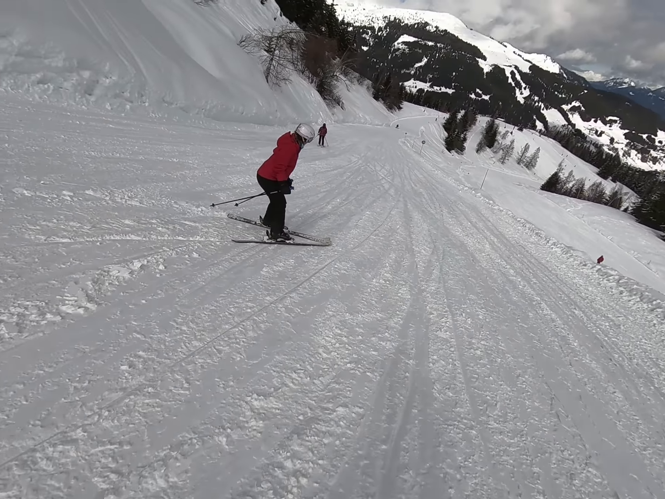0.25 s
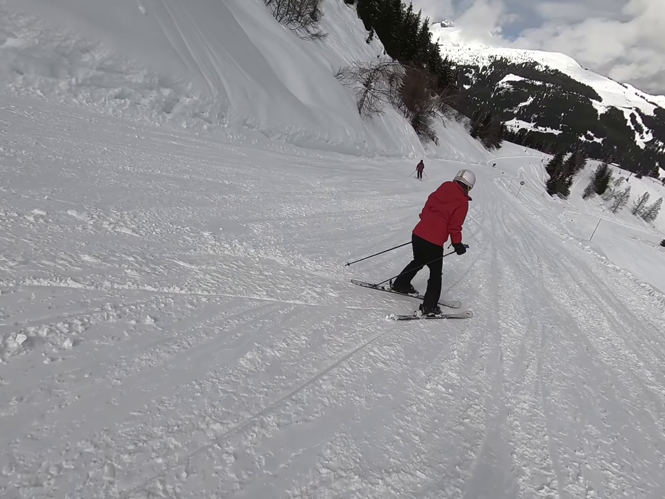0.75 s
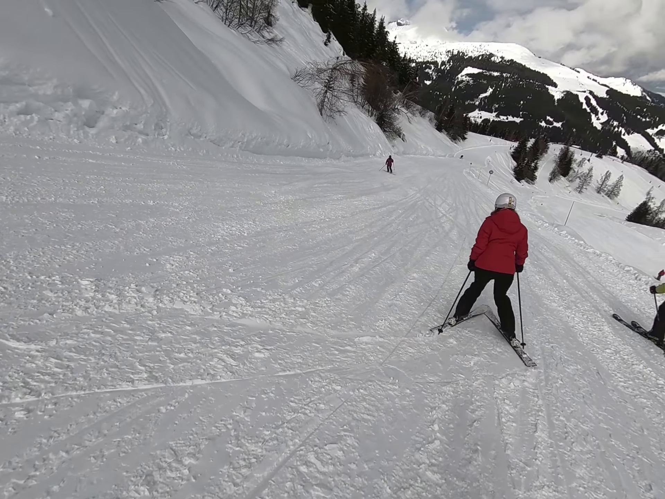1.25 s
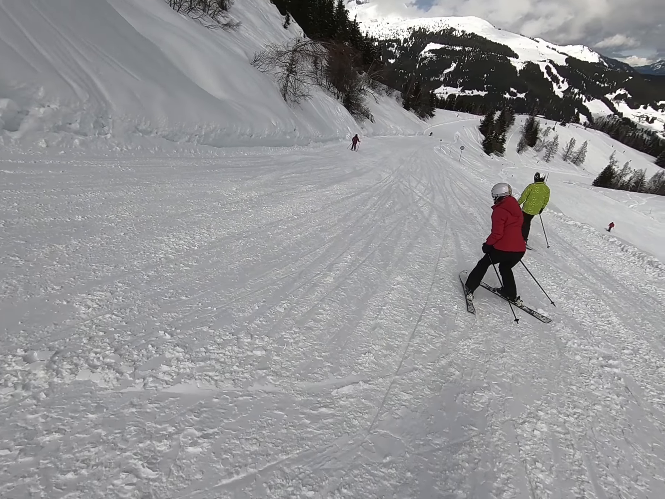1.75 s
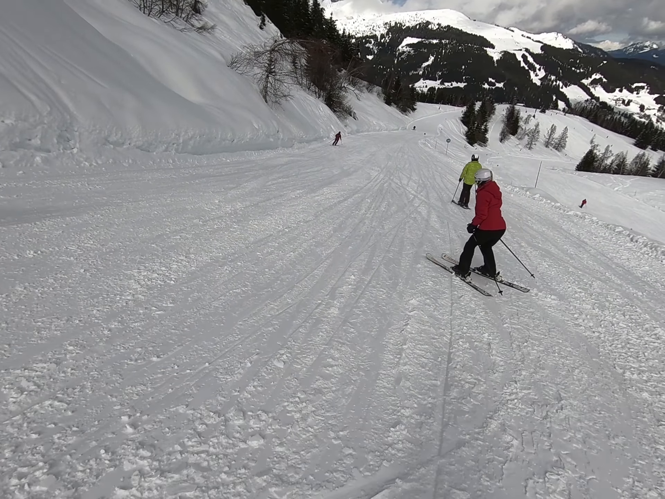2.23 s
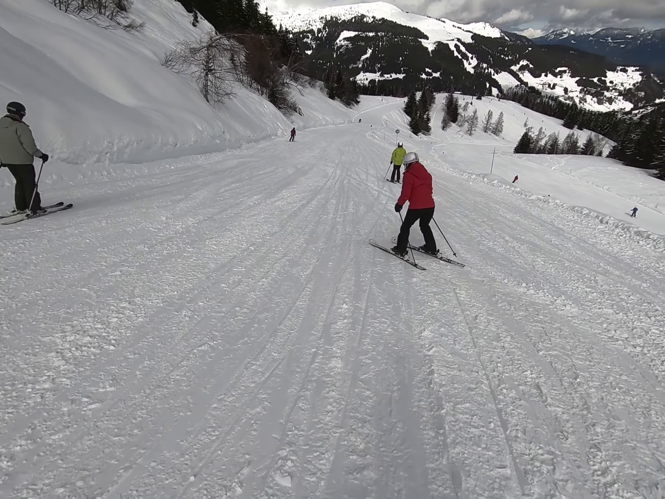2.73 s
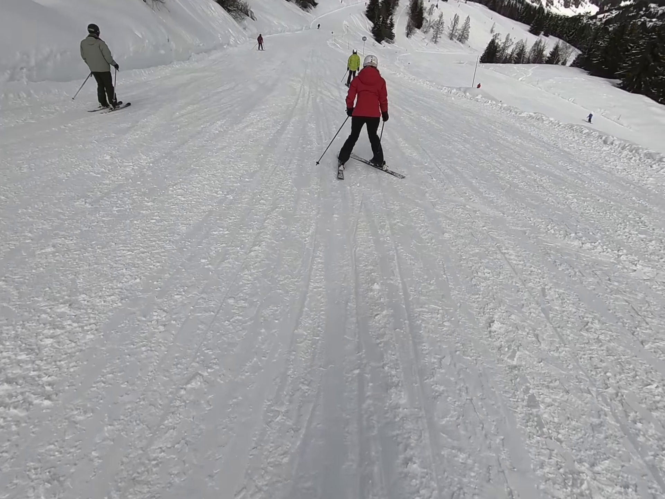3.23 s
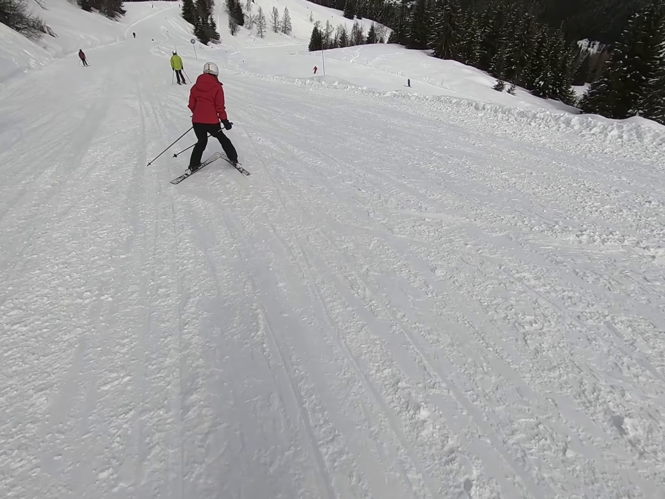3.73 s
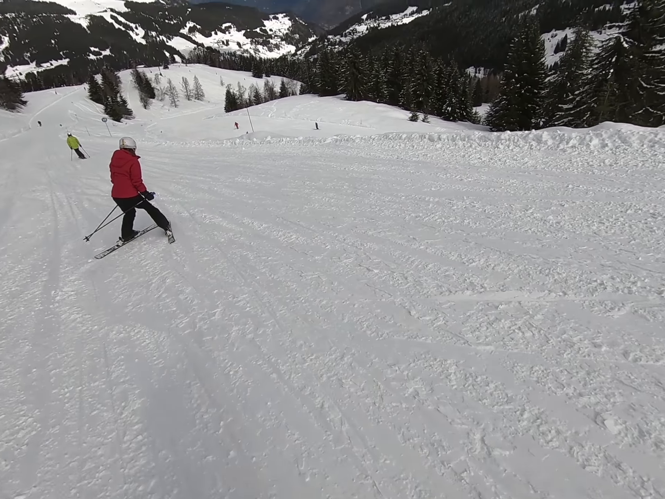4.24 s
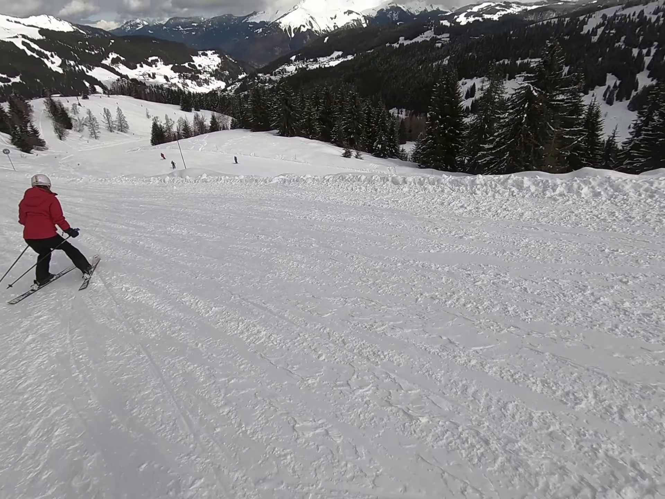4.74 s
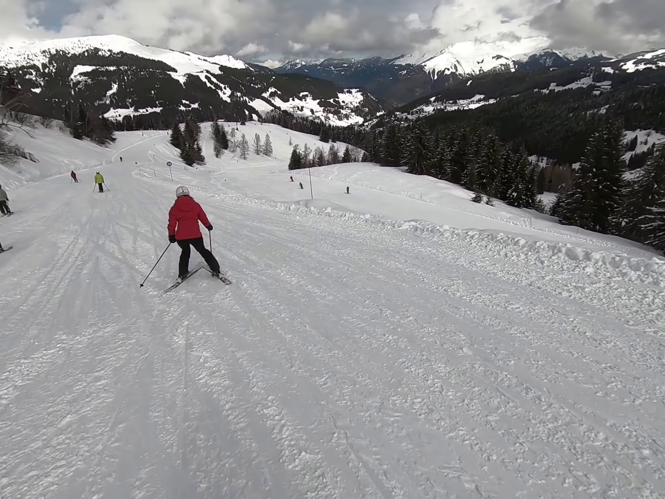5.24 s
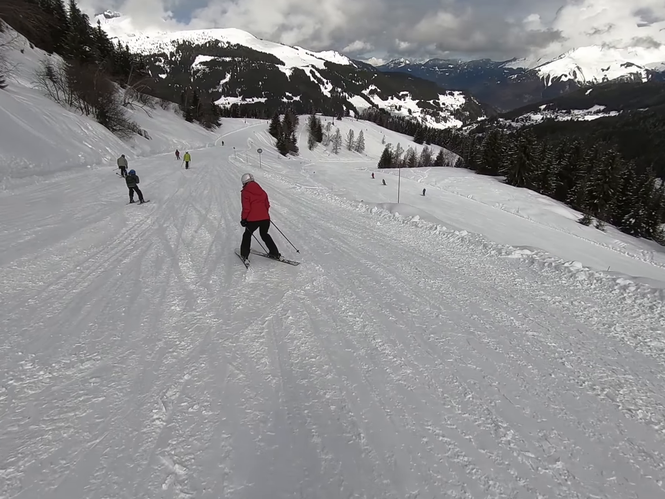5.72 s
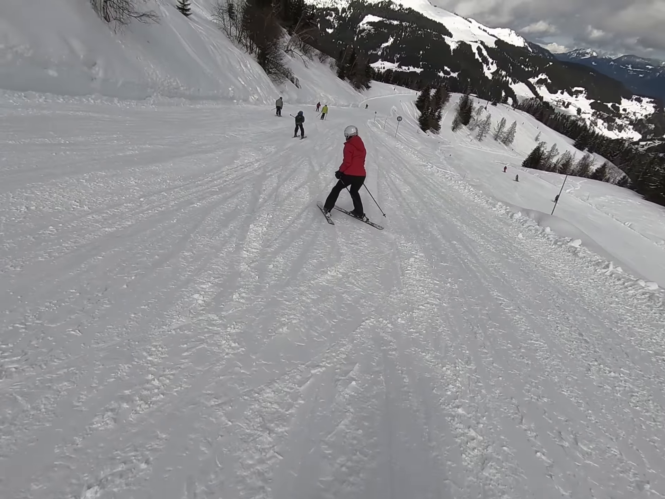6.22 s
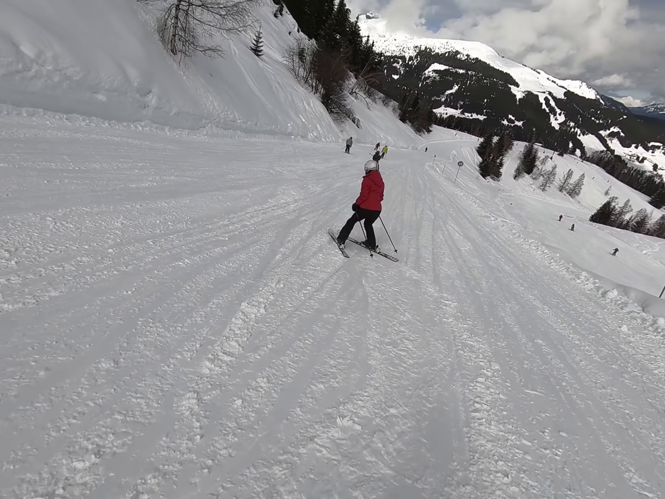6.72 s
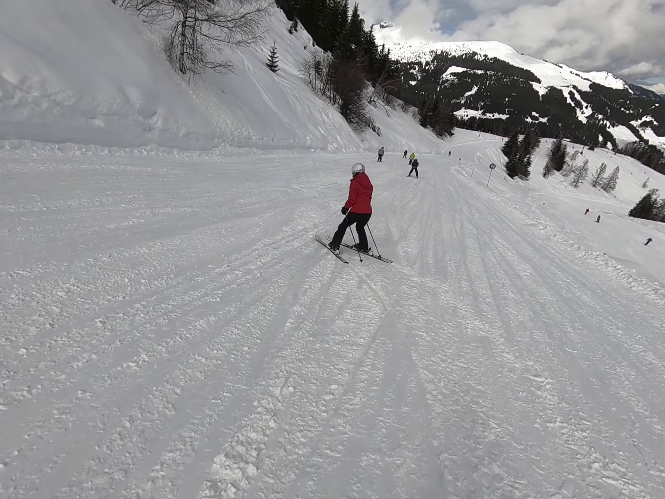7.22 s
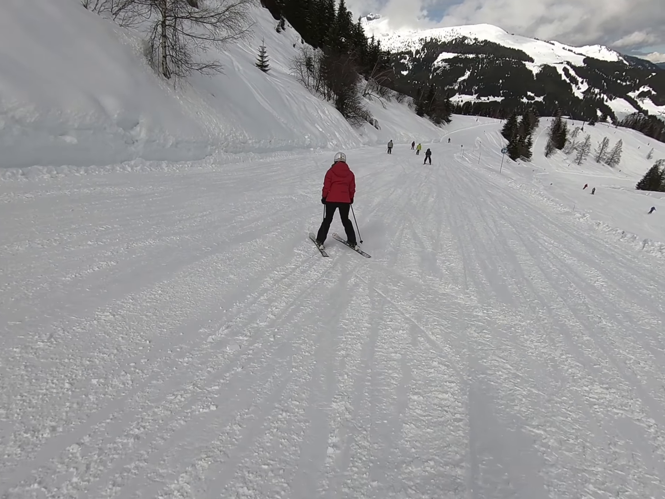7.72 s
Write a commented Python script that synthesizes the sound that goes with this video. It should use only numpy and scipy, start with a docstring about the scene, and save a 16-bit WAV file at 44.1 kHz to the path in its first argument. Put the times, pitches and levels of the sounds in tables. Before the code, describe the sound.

Heard from a microphone worn by a moving skier on an open slope: skis scrape and spray over rough snow, clear and nearly mono with little bass. Another skier hisses past faintly. Around two seconds the sound widens to stereo and deep wind rumble, buffeting and pops flood in, while scraping, crunches and small ski knocks continue until the end.

```python
"""Skis scrape and spray over chopped snow from the first moment, heard from a camera on a skier.
At first its wind mode uses one microphone with the bass cut; only the top treble is stereo.
Then the sound fades mostly to a stereo pair, and wind rumble, buffeting and pops come through.
Skis and wind are shaped noise, with ringing tones for the housing and the singing skis.
Pops are thumps falling in pitch, knocks are short rings, and a passing skier is a bright hiss."""
import sys
import numpy as np
from scipy import signal
from scipy.fft import rfft, irfft, next_fast_len
from scipy.io import wavfile
from scipy.ndimage import uniform_filter1d

SR = 44100
rng = np.random.default_rng(int(sys.argv[2]) if len(sys.argv) > 2 else 0)


def output_pcm(signal):
    """Save a mono or channel-first signal as 16-bit PCM at the path in sys.argv[1].

    Samples are clipped to [-1, 1] before scaling.
    """
    pcm = np.clip(np.atleast_2d(signal).T, -1, 1) * 32767
    wavfile.write(sys.argv[1], SR, np.round(pcm).astype(np.int16))


N = 351477  # length in samples

# In colour tables the level is per Hz and only its shape counts.
# Side is left minus right: above 0 is louder on the left.
# How much of the stereo pair replaces the single microphone: t/s, share/0-1
PAIR_SHARE = [(1.87, 0.0), (2.1, 0.26), (2.5, 0.91), (2.95, 0.8)]

# Scraping and spraying skis: t/s, scrape level/dB, scrape tilt/dB per octave, spray level/dB
SKI_CURVE = [(0.0, -44, 3.5, -50), (0.35, -41.5, 1.2, -50.5), (0.68, -39.5, -2, -52),
             (0.88, -40.5, -1.5, -53.5), (1.0, -42.5, 0.5, -53.5), (1.17, -42.5, 0.5, -53.5),
             (1.35, -45, 1.5, -53), (1.69, -46, 1.5, -55), (2.1, -48, -1.5, -56),
             (2.45, -46.5, -2.5, -54.5), (2.88, -49.5, 0.3, -53.5), (3.15, -46, -0.5, -49.5),
             (3.56, -48.5, 2, -50), (3.66, -47.5, -1.4, -54), (4.2, -45, -2, -52), (4.7, -43, -1.9, -49),
             (4.88, -48, -1, -53.5), (5.15, -50, 0, -55), (5.35, -56.5, 3.5, -59), (5.48, -56.5, 6, -60),
             (5.62, -50.5, 0, -57), (5.97, -45, -2, -52), (6.41, -43.5, -1.5, -50.5),
             (6.95, -47.5, -0.5, -53), (7.45, -46, -0.5, -51), (7.8, -51, 0.5, -54.5), (7.97, -48, 0, -57)]
# Tilt of the spray's colour: t/s, tilt/dB per octave
SPRAY_TILT = [(0.0, 2), (1.75, -2), (2.05, -1), (2.3, 0), (2.7, 1), (4.7, 0.4), (5.0, 0), (5.5, -2),
              (6.0, 2.5), (7.97, 2.5)]
# Side of the skis at the pair: t/s, scrape side/dB, spray side/dB
SKI_SIDE = [(2.1, -8, 3), (2.5, 2.5, 0), (3.15, 4, 0), (3.4, 0, 6), (3.75, -10.5, 1), (4.9, -11, 0),
            (5.3, -8.5, -3), (5.9, -12, -4.5), (6.3, -10.5, -1), (6.9, -7.5, -0.5), (7.3, -11, -1),
            (7.97, -8.5, -1)]
# Edges biting into hard lumps: t/s, level over the scrape/dB
CRUNCHES = [(0.05, 5), (0.3, 2.5), (0.94, 2), (2.26, 3), (3.08, 2), (3.28, 3), (3.7, 3.5), (4.1, 1.5),
            (4.52, 4.5), (4.68, 2), (4.81, 2), (5.07, 2.5), (5.95, 3.5), (6.15, 2), (6.33, 3), (6.8, 1),
            (7.22, 3), (7.5, 2), (7.88, 5)]
# Scrape colour at the single microphone: f/Hz, level/dB
SCRAPE_COLOUR_SINGLE = [(62, -50), (105, -31), (135, -1), (192, 2), (300, -4), (480, -1.5), (900, -6),
                        (1500, -9.5), (1750, -9), (2300, -23.5), (3300, -35.5), (4290, -63)]
# Scrape colour at the stereo pair: f/Hz, level/dB
SCRAPE_COLOUR_PAIR = [(210, -17), (350, -3), (550, -6), (880, -4.5), (1150, -4.5), (1300, -2), (1500, -7.5),
                      (1680, -6.5), (1790, -7.5), (1920, -7), (2610, -8), (3200, -11.5), (4000, -20),
                      (5200, -53.5)]
# Spray colour at the single microphone: f/Hz, level/dB
SPRAY_COLOUR_SINGLE = [(1530, -45), (2600, -12), (3530, -11.5), (4300, -5.5), (5550, 0), (7680, -10.5),
                       (9080, -13.5), (10900, -25.5), (11500, -35), (15000, -52), (22000, -120)]
# Spray colour at the stereo pair: f/Hz, level/dB
SPRAY_COLOUR_PAIR = [(2500, -10), (3600, -5.5), (4200, -3), (5200, 0), (6500, 0), (7600, -1.5),
                     (8400, -5.5), (9300, -9.5), (11000, -16), (12500, -20), (14300, -23.5), (15500, -33)]
# How alike the pair's two channels are for ski sound: f/Hz, likeness/0-1
SKI_LIKENESS = [(480, .7), (900, .6), (1600, .72), (2900, .36), (4200, .28), (6000, .4), (8000, .36),
                (11000, .2)]
# Phase by which the pair's left channel leads for ski sound: f/Hz, lead/radians
SKI_LEAD = [(520, -.3), (820, 1.3), (1900, .3), (3000, -1.3), (4200, -.9), (5500, -3.7), (7500, -4.9),
            (9300, -7.2)]
# Spray image shifting once, near 4 s: t/s, added lead/radians per kHz from 6 kHz, likeness factor
SPRAY_IMAGE = [(3.7, 1.5, 1.25), (4.1, 0, .4), (6.0, 0, .8)]
# Side of the spray by pitch: f/Hz, side/dB
SPRAY_SIDE = [(3700, 0), (4600, 2.5), (5700, 2), (6700, -0.5), (9500, 1.5)]
# Skis singing at an upper mode while they carve: t/s, level against the scrape/dB
SINGING = [(2.5, -22), (3.8, -18), (4.35, -12.5), (4.6, -10.5), (4.8, -9.5), (5.12, -8.5), (5.35, -23),
           (6.2, -23), (7.0, -13.5), (7.97, -13)]
# Stereo top treble of the wind mode: f/Hz, level/dB
TOP_COLOUR = [(6710, -50), (11400, -8), (11900, 1), (12400, 4.5), (14800, -3), (15500, -1.5)]

# Wind left by the bass cut: f/Hz, level/dB
CALMED_COLOUR = [(15, -18), (25, -2), (50, -5), (80, -12), (115, -9), (160, -50), (500, -92)]

# Hard lumps knocking the skis: t/s, peak level/dB, centre of the blow f/Hz, side/dB
KNOCKS = [(0.49, -39, 600, 0), (0.933, -32, 600, -2), (2.255, -38, 1500, -2), (2.877, -42, 1500, -6),
          (3.4525, -38, 1250, -10), (3.56, -37, 1600, -8), (3.966, -37, 1800, -12), (4.51, -42, 2000, -10),
          (4.564, -37, 1800, -10), (4.665, -40, 1300, -10), (5.075, -39, 1800, -11), (5.26, -45, 1800, -9),
          (5.751, -39, 1300, -15), (5.945, -40, 1400, -9), (6.487, -40, 1300, -6), (7.13, -39, 1300, -8),
          (7.505, -40, 1400, -8), (7.789, -36, 1800, -4), (7.869, -35.5, 1400, -6), (7.882, -41, 900, -8)]
# Ringing modes of the skis: f/Hz, level/dB, time to fall by 60 dB/s
SKI_MODES = [(600, -6, 0.059), (940, -4, 0.028), (1314, 1.5, 0.027), (1792, -1.5, 0.043), (2205, -3, 0.035),
             (2800, -6.5, 0.018)]
# Single wind pops at the microphone ports: t/s, level/dB, final pitch f/Hz, length/s, side/dB
POPS = [(1.909, -28.5, 120, 0.018, -0.5), (1.997, -30.5, 150, .011, -1), (2.137, -36, 500, 0.0064, -8),
        (2.8775, -25, 222, 0.0073, -8), (3.256, -32, 150, 0.015, 13), (3.285, -32.5, 600, 0.0049, -8),
        (3.295, -36, 700, .005, -6), (3.334, -36, 496, 0.006, -15), (3.681, -36, 450, .005, -12),
        (3.687, -34, 300, 0.0093, -8), (3.705, -32, 300, 0.0092, -11), (5.04, -37, 252.4, 0.011, -10),
        (5.22, -36.5, 200, 0.014, -14), (5.785, -30.5, 150, 0.018, -14), (5.795, -28, 160, 0.018, -10),
        (5.92, -37, 140.5, 0.014, -2), (7.933, -40, 250, 0.013, -6)]

# Brighter spray while another skier slides by: t/s, level/dB
PASSING_LEVEL = [(1.35, -76), (1.52, -56), (1.8, -58), (2.2, -65)]
# Colour of that spray: f/Hz, level/dB
PASSING_COLOUR = [(5500, -28), (6500, -1), (7500, -4), (8400, -9), (9200, -30), (12000, -70)]

# Wind ringing the housing: t/s, level/dB
BOOM_LEVEL = [(1.87, -51), (2.04, -37.5), (2.3, -27.5), (2.5, -21.5), (2.8, -27.5), (3.1, -22),
              (3.4, -21.5), (3.6, -16.5), (3.78, -18.5), (4.25, -23), (4.55, -27), (4.75, -24),
              (5.05, -20.5), (5.3, -23.5), (5.52, -27), (5.65, -19), (6.15, -18.5), (6.4, -27), (6.7, -26),
              (6.95, -30.5), (7.1, -24.5), (7.35, -29.5), (7.55, -19.5), (7.8, -21), (7.97, -26)]
# Colour of the noise around the ring: f/Hz, level/dB
RUMBLE_COLOUR = [(14, -15), (24, 0), (34, -1), (45, 0), (58, -3), (74, -15), (100, -32), (400, -90)]
# Brief dips of the wind between gusts: t/s, drop/dB
LULLS = [(2.4, 11), (2.66, 12), (2.87, 11), (3.27, 7), (3.43, 3.5), (3.86, 14), (3.98, 7), (4.1, 11),
         (4.48, 3.5), (4.62, 6), (4.9, 7), (5.43, 13), (5.79, 2), (6.07, 11.5), (6.45, 8), (6.91, 14),
         (7.25, 7), (7.59, 8), (7.71, 7), (7.92, 5)]
# Buffeting at the ports: t/s, level/dB, side/dB, tilt/dB per octave
BUFFET_CURVE = [(1.87, -62, -1, 0), (1.95, -46, -1, -1), (2.62, -31.5, -11, .5), (2.85, -27.5, 2.5, 0),
                (3.2, -25.5, 0, 1), (3.65, -31, -4.5, 2.1), (4.1, -35, 7.5, -1.5), (4.3, -40.5, 5, -2.5),
                (4.85, -34, -1, -1), (5.15, -39, -6, -1), (5.3, -34.5, 6, 0), (5.52, -31, -10, 1.5),
                (5.8, -32.5, -11.5, 6), (5.92, -29, -1, 2), (6.1, -32.5, -6, 4), (6.25, -30, -6, 1.5),
                (6.6, -30.5, -11, 0.5), (6.88, -33.5, -1, -.5), (7.08, -23, 0.5, -2), (7.25, -28, -8.5, -3),
                (7.5, -30.5, 5, -1.5), (7.97, -27, 3.5, -1)]
# Colour of the buffeting before tilting: f/Hz, level/dB
BUFFET_COLOUR = [(40, -0.5), (75, 6), (120, 2), (170, -5.5), (260, -13), (400, -22.5), (800, -39.5),
                 (3000, -99)]

CRUNCH_S, SPRAY_SHARE = 0.023, 0.41  # half-width of a bite (s), part of its dB that reaches the spray
SING_HZ, SING_WIDTH_HZ = 1800, 49
SING_WANDER, SING_LUMPS_DB = 0.011, 2.5  # drift as a share of pitch, unevenness (dB rms)
TOP_DB, TOP_FALLS_S, TOP_FALL_DB_PER_S = -59, .47, 7.3  # starting level, start and speed of its fall
CALMED_DB, CALMED_LUMPS_DB = -55.5, 5
BLOW_OCTAVES = 0.43  # how far around its centre a blow reaches
BOOM_HZ, BOOM_LUMPS_DB = 43.1, 1.5
BOOM_WANDER, BOOM_WOBBLE = 0.0708, 0.089  # slower and faster drift, as a share of pitch
LULL_S = 0.036  # half-width of a lull
EDGE_HZ = 15650  # top of the band


def gain_of(db):
    """Turns decibels into a factor."""
    return 10 ** (np.asarray(db) / 20)


def evened(x):
    """Scales to rms 1."""
    return x / np.sqrt(np.mean(x ** 2) + 1e-20)


def read(points, hz):
    """Reads a table along a log-frequency axis."""
    f, value = np.transpose(points)
    return np.interp(np.log(hz + 1), np.log(f + 1), value)


def columns(rows, t):
    """Reads each column of a curve at the times t."""
    s, *values = np.transpose(rows)
    return [np.interp(t, s, v) for v in values]


def pair_share(t):
    """Share of the stereo pair at the times t."""
    return columns(PAIR_SHARE, t)[0]


def drift(t, rate):
    """Slow chance of rms 1: a sum of sines up to the given rate a second."""
    f = np.geomspace(rate / 10, rate, 30)[:, None]
    return evened(np.sin(2 * np.pi * (f * t + rng.random(f.shape))).sum(0))


def slow(t, rate):
    """Slow chance, drawn coarsely and read at the times t."""
    coarse = t[::64]
    return np.interp(t, coarse, drift(coarse, rate))


def bumps(t, rows, width):
    """Short swells in dB, one for each row."""
    return sum(db * np.exp(-((t - s) / width) ** 2) for s, db in rows)


def grid(size):
    """Frequencies (a column) and times of short-time spectra."""
    return np.fft.rfftfreq(size, 1 / SR)[:, None], (np.arange(4 * N // size + 4)) * size / 4 / SR


def noise(db, same, lead=0, side_db=0):
    """Two-channel noise of rms 1 from a dB field over frequency and time, with even power over time."""
    size = 2 * len(db) - 2
    a, b, c, d = rng.standard_normal((db.shape[1], len(db), 4)).T
    shape, same = gain_of(db), np.clip(same, 0, 1)
    common, other = a + 1j * b, c + 1j * d
    left = common * np.exp(1j * lead)
    right = same * common + np.sqrt(1 - same ** 2) * other
    z = np.array([left * gain_of(side_db / 2), right * gain_of(-side_db / 2)])
    z *= shape / np.linalg.norm(shape, axis=0)
    sound = signal.istft(z, nperseg=size, noverlap=3 * size // 4)[1]
    return evened(sound[:, :N])


def steady(colour, same, lead=0):
    """Two-channel noise of one fixed colour, rms 1."""
    size = next_fast_len(N)
    a, b = rfft(rng.standard_normal((2, size)))
    z = np.array([a * np.exp(1j * lead), same * a + np.sqrt(1 - same ** 2) * b])
    shape = gain_of(read(colour, np.fft.rfftfreq(size, 1 / SR)))
    return evened(irfft(z * shape, size)[:, :N])


def panned(x, db, side_db):
    """Applies a level and a left-right lean."""
    return x * gain_of(db + np.array([[.5], [-.5]]) * side_db)


def ski_colour(single, pair, tilt, pivot_hz, patchy_db):
    """Fades between the two microphone colours, tilts them and adds drifting patches."""
    hz, frames = grid(size=1024)
    share = pair_share(frames)
    single_power, pair_power = (gain_of(read(c, hz)) ** 2 for c in (single, pair))
    blend = (1 - share) * single_power / single_power.sum() + share * pair_power / pair_power.sum()
    patches = rng.standard_normal((len(frames), len(hz))).T
    patches = uniform_filter1d(patches, 12, 0)  # smooth over frequency
    patches = evened(uniform_filter1d(patches, 8, 1))  # smooth over time
    tilt_db = np.clip(tilt, -4, 4) * np.log2((hz + 50) / pivot_hz)
    return 10 * np.log10(blend) + tilt_db + patchy_db * patches


def ski_image():
    """How alike the channels are and how far left leads, as the single microphone gives way."""
    hz, frames = grid(size=1024)
    share = pair_share(frames)
    same = 1 - share * (1 - read(SKI_LIKENESS, hz))
    opened = np.minimum(1.25 * share, 1)  # the phase image opens sooner than the mix
    return same, opened, opened * read(SKI_LEAD, hz)


def scrape_noise():
    """Edges scraping over snow, as patchy noise of changing tilt."""
    _, frames = grid(size=1024)
    same, _, lead = ski_image()
    tilt = columns(SKI_CURVE, frames)[1]
    colour = ski_colour(SCRAPE_COLOUR_SINGLE, SCRAPE_COLOUR_PAIR, tilt, 1000, patchy_db=1.5)
    side_db = pair_share(frames) * 1.3 * np.cos(2 * lead)  # a lean that varies with the phase lead
    return noise(colour, same, lead, side_db)


def spray_noise():
    """Thrown snow hissing, as bright noise whose stereo image shifts once, near 4 s."""
    hz, frames = grid(size=1024)
    share = pair_share(frames)
    same, opened, lead = ski_image()
    added_lead, likeness = columns(SPRAY_IMAGE, frames)
    tilt = columns(SPRAY_TILT, frames)[0]
    colour = ski_colour(SPRAY_COLOUR_SINGLE, SPRAY_COLOUR_PAIR, tilt, 6500, patchy_db=.7)
    same = same * (1 + share * (likeness - 1))
    lead = lead + opened * added_lead * (hz / 1000 - 6)
    return noise(colour, same, lead, share * read(SPRAY_SIDE, hz))


def singing(t, scrape):
    """The scrape excites one ski mode: a narrow resonator whose pitch wanders."""
    turn = np.exp(2j * np.pi * np.cumsum(SING_HZ * (1 + SING_WANDER * slow(t, 8))) / SR)
    # Shift the mode down to 0 Hz, let it ring there, then shift it back.
    ring = signal.lfilter([1], [1, -np.exp(-np.pi * SING_WIDTH_HZ / SR)], scrape / turn)
    sung = evened((turn * ring).real)
    return sung * gain_of(columns(SINGING, t)[0] + SING_LUMPS_DB * slow(t, 15)) * pair_share(t)


def top_treble(t):
    """The wind mode's stereo top treble: steady hiss that sinks and leaves with the single microphone."""
    top_db = TOP_DB - TOP_FALL_DB_PER_S * np.maximum(t - TOP_FALLS_S, 0)
    return panned(steady(TOP_COLOUR, same=.1), 0, -2.0) * gain_of(top_db) * (1 - pair_share(t))


def skis(t):
    """Edges scrape the lumps and throw spray; each lump shakes both at once."""
    share = pair_share(t)
    scrape_db, _, spray_db = columns(SKI_CURVE, t)
    scrape_side_db, spray_side_db = columns(SKI_SIDE, t) * share
    bite_db = bumps(t, CRUNCHES, CRUNCH_S)
    _, frames = grid(size=1024)
    lumps = np.interp(t, frames, drift(frames, 70))
    apart_db = 0.33 * share  # makes up for unlike channels losing power in the middle
    scrape = scrape_noise()
    scrape = scrape + singing(t, scrape)
    scrape = panned(scrape, scrape_db + bite_db + apart_db + 1.15 * lumps, scrape_side_db)
    spray_db = spray_db + SPRAY_SHARE * bite_db + apart_db + 0.67 * lumps
    return scrape + panned(spray_noise(), spray_db, spray_side_db) + top_treble(t)


def calmed_wind(t):
    """Wind left by the bass cut: uneven low noise, the same on both sides."""
    level = gain_of(CALMED_DB + CALMED_LUMPS_DB * slow(t, 10))
    return steady(CALMED_COLOUR, same=1) * level * (1 - pair_share(t))


def knock(centre_hz):
    """A blow rings the ski modes that lie near its centre; each mode dies away."""
    hz, db, t60 = np.transpose(SKI_MODES)[:, :, None]
    u = np.arange(SR // 20) / SR
    reach = np.exp(-(np.log2(hz / centre_hz) / BLOW_OCTAVES) ** 2)
    hz = hz * rng.uniform(0.94, 1.04, hz.shape)
    rings = reach * gain_of(db - 60 * u / t60) * np.sin(2 * np.pi * (hz * u + rng.random(hz.shape)))
    sound = rings.sum(0) * np.minimum(u / 0.0012, 1)  # 1.2 ms rise
    return sound / abs(sound).max()


def pop(hz, length=.012, fall_hz=350, fall_s=0.0029, grit=0.17):
    """A dull thump whose pitch drops quickly towards hz; crunchy at first."""
    u = np.arange(0, 1, 1 / (length * SR))  # 0 to 1 over the pop
    cycles = hz * length * u + fall_hz * fall_s * (1 - np.exp(-length * u / fall_s))
    crunch = evened(np.convolve(rng.standard_normal(SR // 20), np.hanning(24), "same"))
    shape = np.sin(np.pi * u ** 0.4) ** 2
    return (np.sin(2 * np.pi * cycles) + grit * crunch[:len(u)] * (1 - u)) * shape


def patter(t):
    """A random patter of small pops and knocks that follows the scrape's level."""
    share = pair_share(t)
    scrape_db, side_db = columns(SKI_CURVE, t)[0], columns(SKI_SIDE, t)[0]
    hits = rng.random(N) < 90 / SR  # about 90 a second
    size = gain_of(2.6 * np.minimum(rng.exponential(1, N), 3)) * hits
    kind = rng.integers(0, 8, N)
    small = [pop(hz, length=0.0086) for hz in (120, 200, 333, 517)]
    small += [0.68 * knock(hz) for hz in (900, 1300, 1900, 2600)]
    size = size * np.where(kind < 6, 1, share)  # the single microphone misses the two brightest knocks
    mixed = sum(signal.oaconvolve(size * (kind == k), sound)[:N] for k, sound in enumerate(small))
    return panned(evened(mixed), scrape_db - 11.0, side_db * share)


def pops_and_knocks():
    """The listed wind pops and ski knocks, each set at its time and side."""
    out = np.zeros((2, N + SR))
    sounds = [(s, db, side_db, knock(hz)) for s, db, hz, side_db in KNOCKS]
    sounds += [(s, db, side_db, pop(hz, length)) for s, db, hz, length, side_db in POPS]
    for s, db, side_db, sound in sounds:
        start = round(s * SR)
        out[:, start:start + len(sound)] += panned(sound, db, side_db)
    return out[:, :N]


def passing(t):
    """Another skier's spray: a short bright hiss, the same on both sides."""
    return steady(PASSING_COLOUR, same=1) * gain_of(columns(PASSING_LEVEL, t)[0])


def housing_boom(t):
    """Gusts ring the housing, mostly on the right: a wandering low tone in rumbling noise."""
    boom_hz = BOOM_HZ * (1 + BOOM_WANDER * slow(t, 3) + BOOM_WOBBLE * slow(t, 20))
    left_right_phase = np.array([[-.8], [0]])  # radians
    ring = np.sqrt(2) * np.sin(2 * np.pi * np.cumsum(boom_hz) / SR + left_right_phase)
    boom = evened(ring + .62 * steady(RUMBLE_COLOUR, same=.65, lead=-.8))
    boom = evened(boom * gain_of(BOOM_LUMPS_DB * slow(t, 9)))
    return panned(boom, columns(BOOM_LEVEL, t)[0] - bumps(t, LULLS, LULL_S), -11.0)


def buffeting(t):
    """Smaller eddies buffet each port: nearly separate noises with their own unsteady levels."""
    buffet_db, side_db, _ = columns(BUFFET_CURVE, t)
    hz, frames = grid(size=4096)
    tilt = columns(BUFFET_CURVE, frames)[2]
    colour = read(BUFFET_COLOUR, hz) + tilt * np.log2(np.clip(hz, 60, 260) / 130)
    eddies_db = np.array([2.6 * slow(t, 20) for _ in range(2)])
    lull_db = 0.19 * bumps(t, LULLS, LULL_S)
    return panned(noise(colour, same=0.12), buffet_db + eddies_db - lull_db, side_db)


def open_wind(t):
    """Boom and buffeting, coming in over 50 ms as the pair begins to fade in."""
    onset = np.clip((t - PAIR_SHARE[0][0]) / .05, 0, 1)
    return (housing_boom(t) + buffeting(t)) * onset


def scene():
    """Skis, wind, knocks and pops in the open air."""
    t = np.arange(N) / SR
    return skis(t) + calmed_wind(t) + patter(t) + pops_and_knocks() + passing(t) + open_wind(t)


def record(dry):
    """A soft limit rounds the largest swings, the last 8 ms fade out; then the top is cut off."""
    fade = np.minimum(np.arange(N)[::-1] / (.008 * SR), 1)
    limited = .5 * np.tanh(dry / .5) * fade
    edge = signal.firwin(1023, EDGE_HZ, window=("kaiser", 11), fs=SR)
    padded = np.pad(limited, ((0, 0), (511, 511)), "reflect", reflect_type="odd")
    return signal.oaconvolve(padded, edge[None], "valid")


dry = scene()
out = record(dry)
output_pcm(out)
```